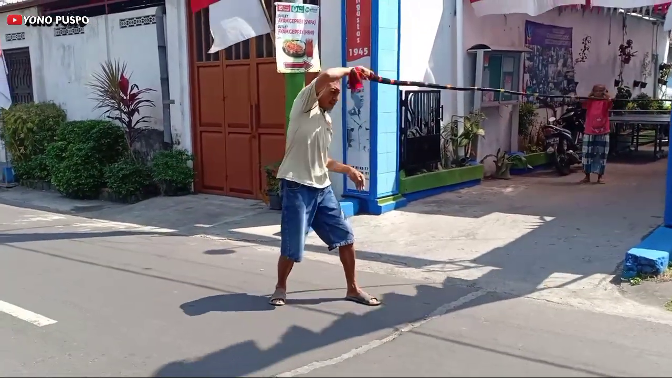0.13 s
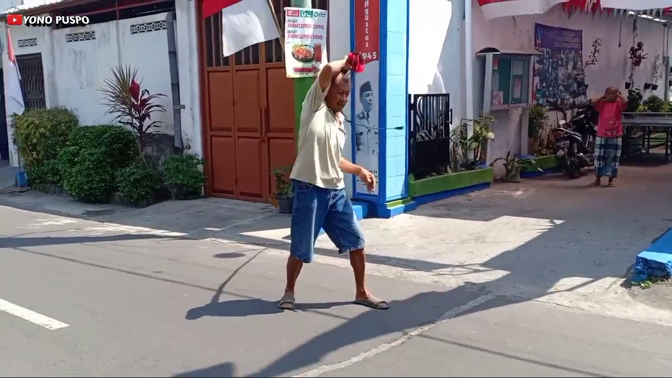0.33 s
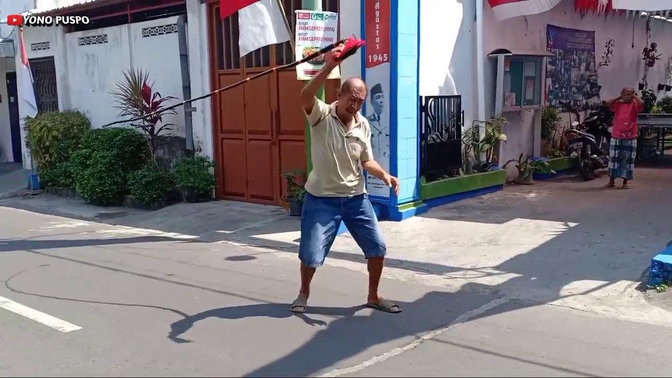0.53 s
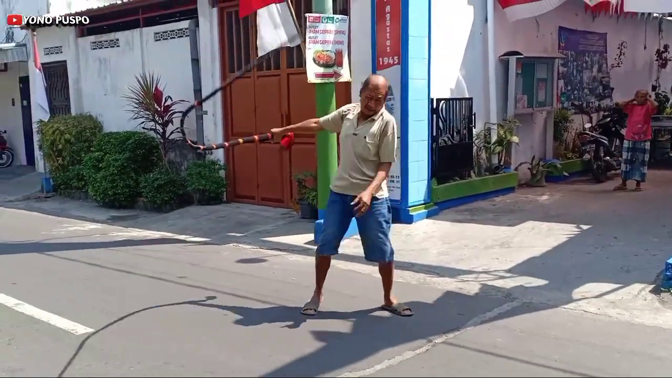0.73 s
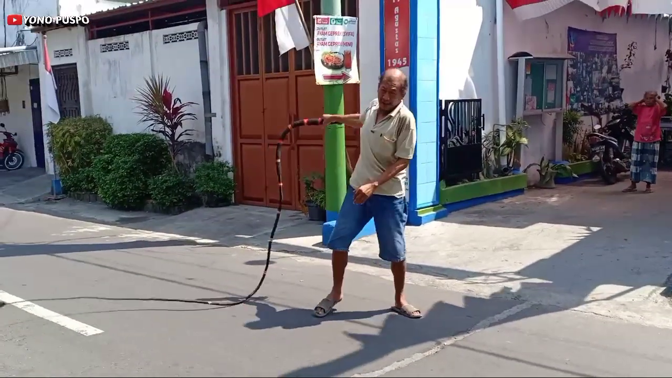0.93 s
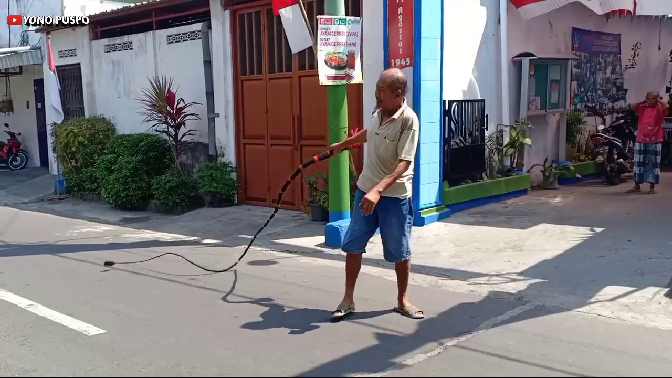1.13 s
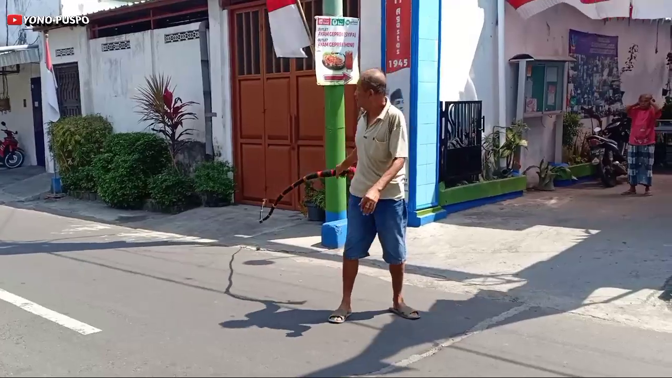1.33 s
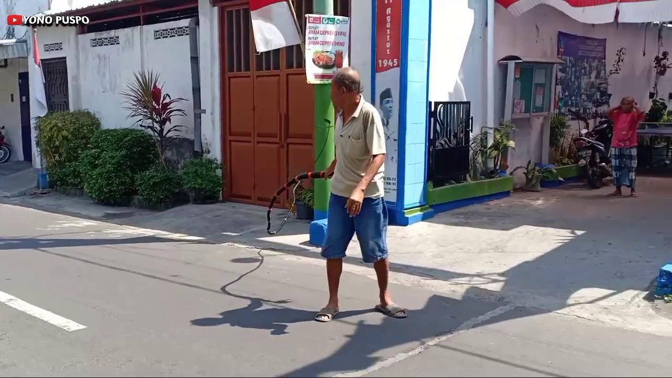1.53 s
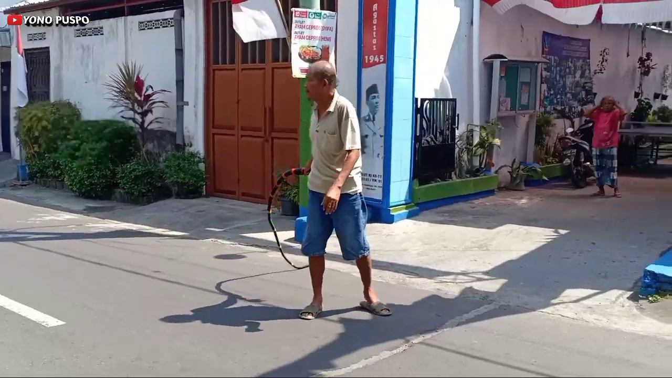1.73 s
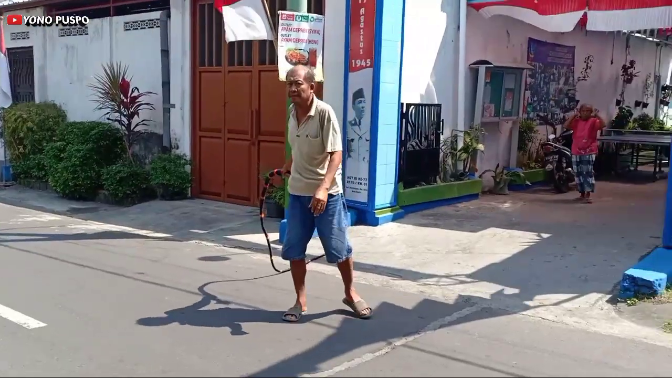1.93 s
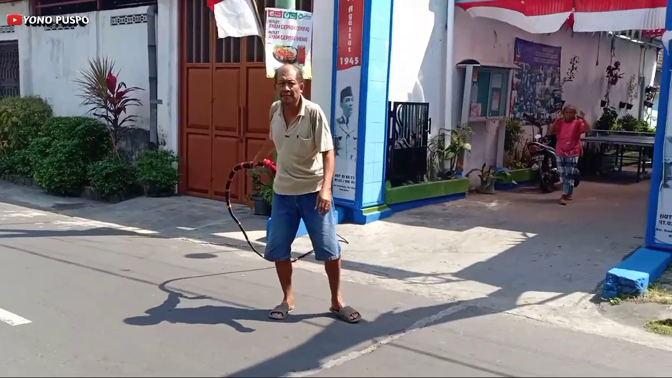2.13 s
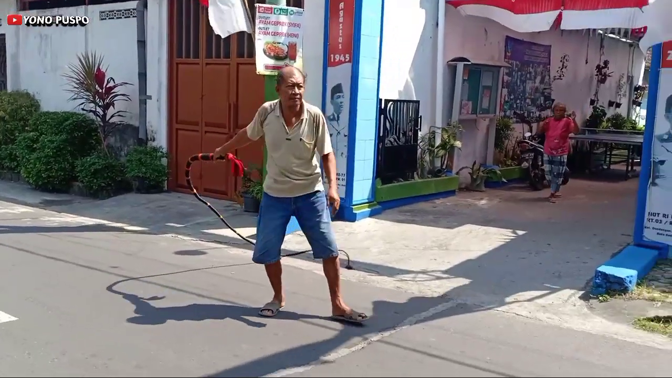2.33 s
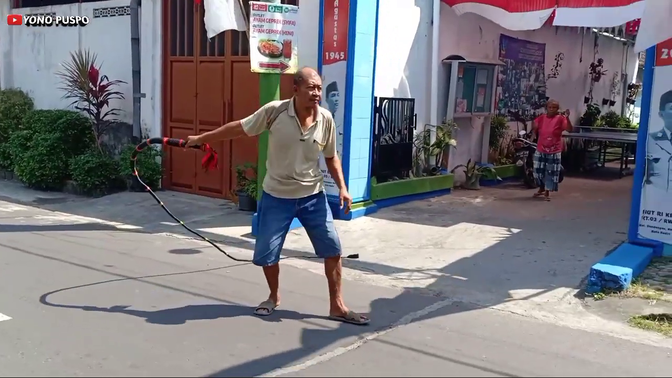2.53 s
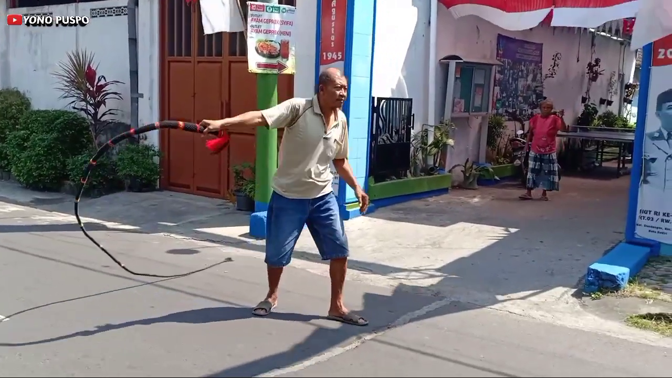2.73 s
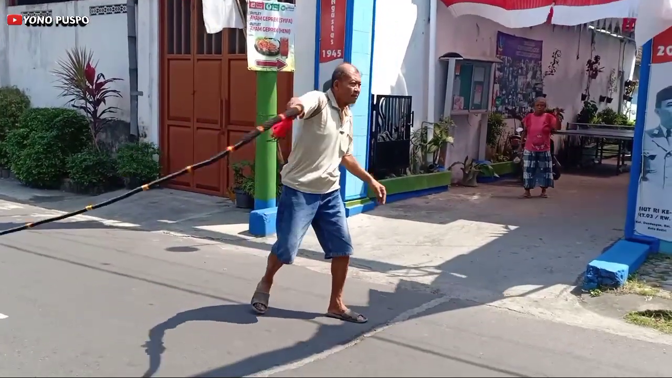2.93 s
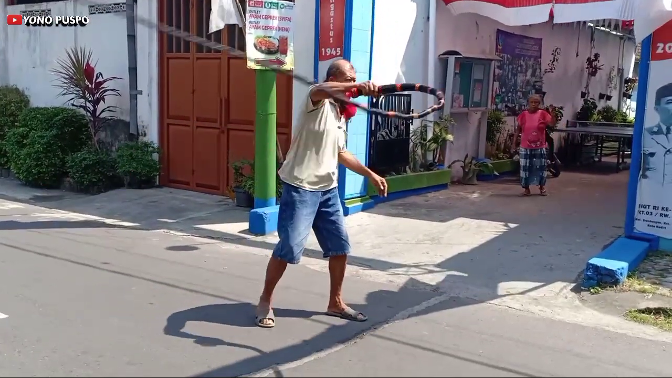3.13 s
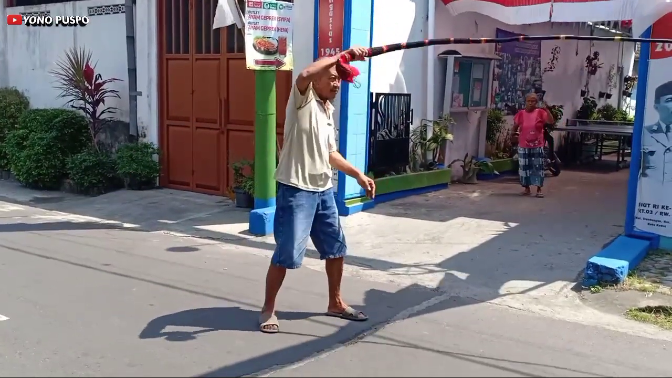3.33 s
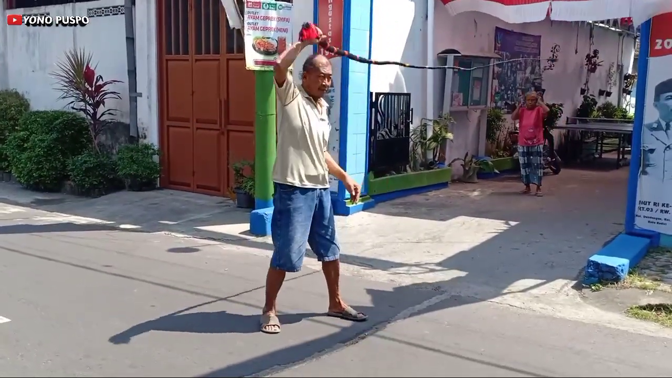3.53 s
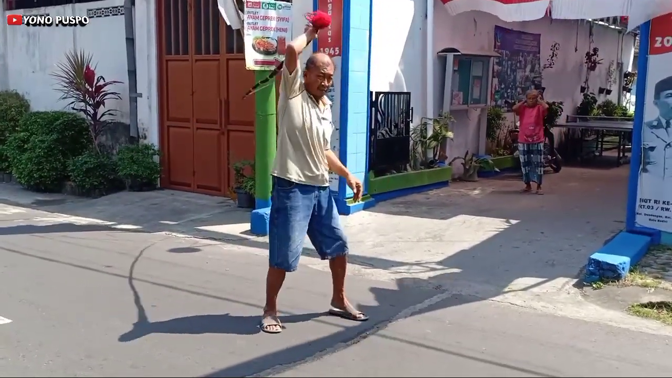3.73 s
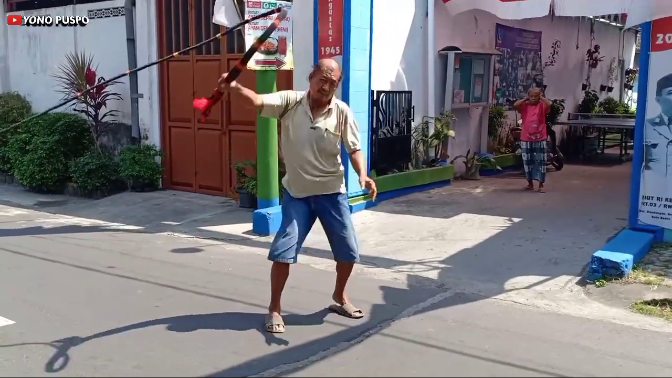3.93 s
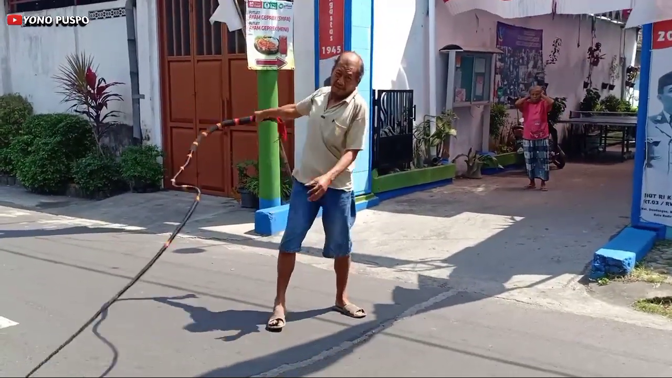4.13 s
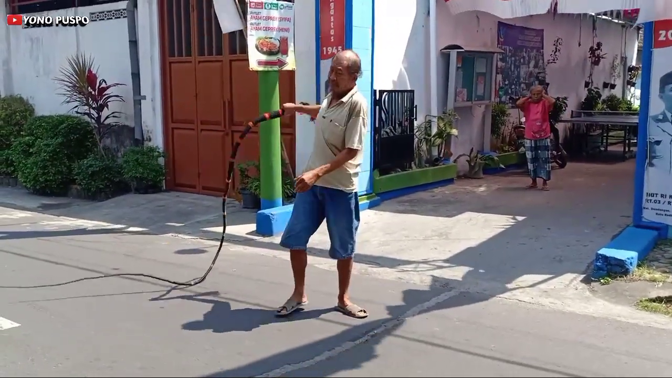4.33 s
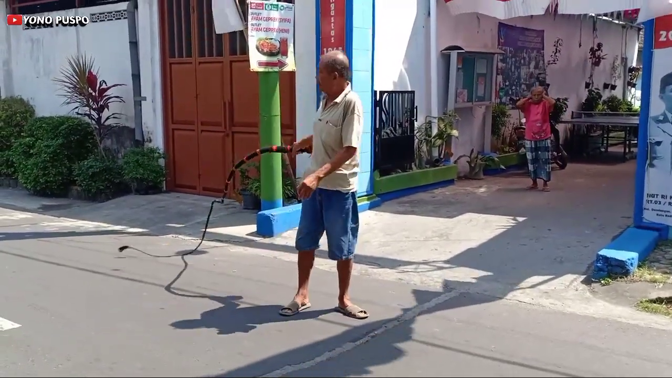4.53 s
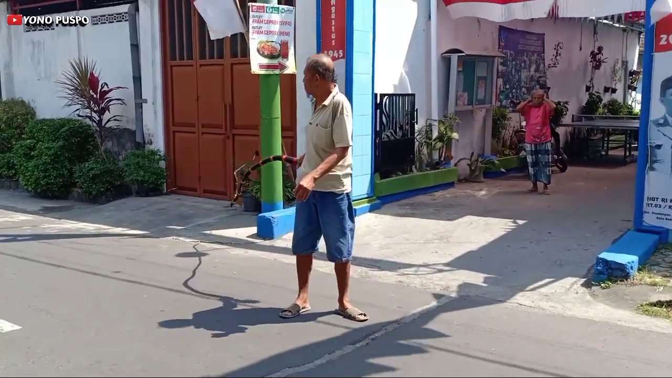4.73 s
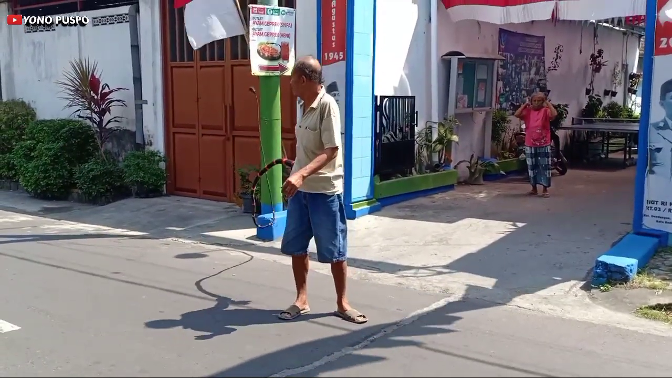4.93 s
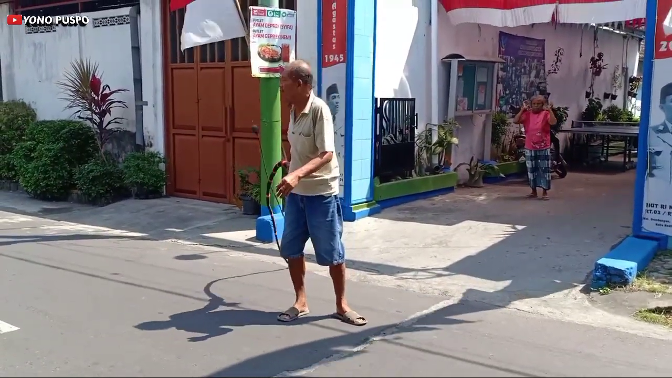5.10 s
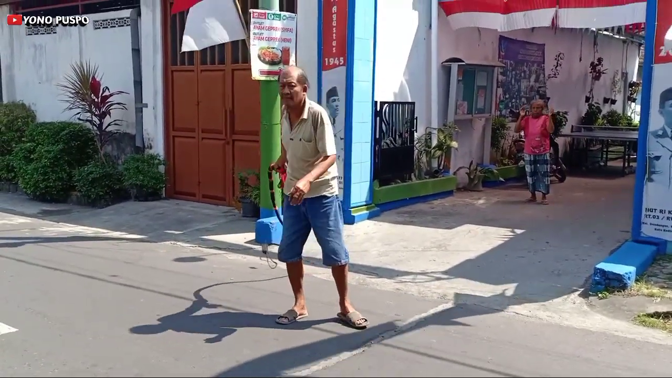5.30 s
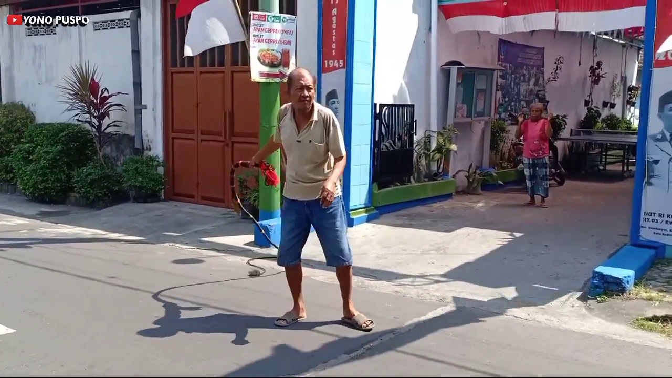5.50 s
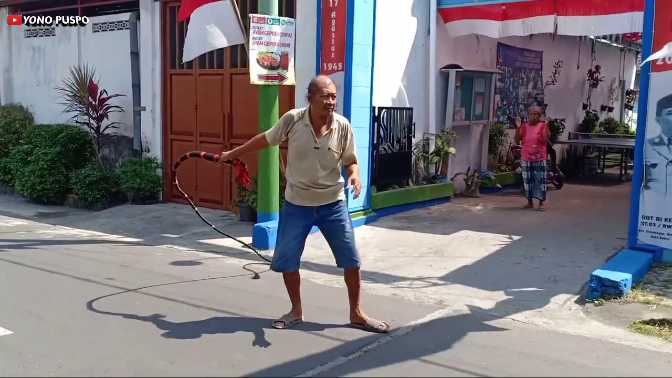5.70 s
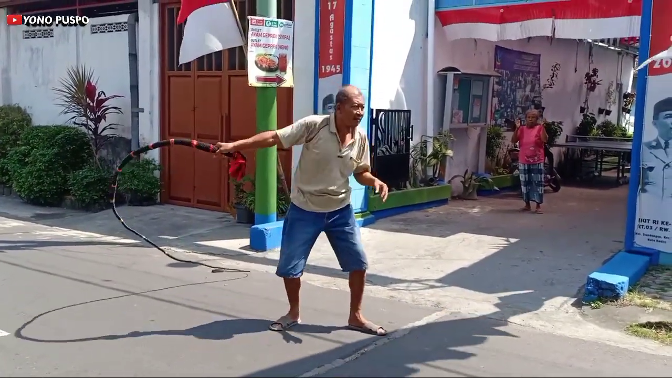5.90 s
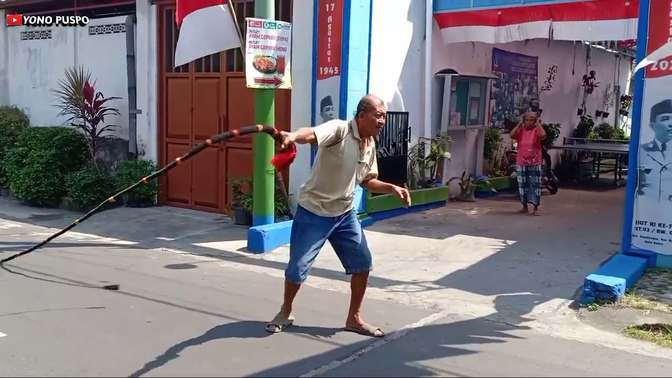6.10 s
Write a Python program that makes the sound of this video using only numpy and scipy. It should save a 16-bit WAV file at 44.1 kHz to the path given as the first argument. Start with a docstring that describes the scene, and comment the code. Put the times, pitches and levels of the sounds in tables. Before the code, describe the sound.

Outdoors in a walled street, a small motorbike draws away over low distant traffic rumble. A long whip ticks and scuffs on the tarmac, then cracks violently, with a low thump and a dense, quickly fading wash off the walls. More ticks and a soft sinking whirr lead to a second similar crack. A phone microphone nearby overloads on both, and the background dips after each.

```python
"""A small motorbike is heard first, drawing away over a town's rumble: exhaust partials, puffing hiss and gear whine.
A lash ticks, scuffs the tarmac and whirrs: damped sines, gritty noise bursts and a noise band of sinking pitch.
A long whip cracks twice in a walled street: low noise bursts, and a dense wash of the crack and its returns.
A phone with two microphone ports hears it all; its gain drops and its input clips under the shock."""
import sys
import numpy as np
from scipy import signal
from scipy.fft import rfft, irfft, next_fast_len
from scipy.io import wavfile
from scipy.ndimage import uniform_filter1d, minimum_filter1d

SR = 44100
rng = np.random.default_rng(int(sys.argv[2]) if len(sys.argv) > 2 else 0)


def dump_mix(stems):
    """Bounce the given channels to the path in sys.argv[1] as a 16-bit WAV at rate SR."""
    frames = np.atleast_2d(stems).T  # one column per channel
    limited = np.clip(frames, -1, 1)  # hard clip at full scale
    pcm = np.round(limited * 32767).astype(np.int16)
    wavfile.write(sys.argv[1], SR, pcm)


N = 276066

# Spectrum of the town's rumble: frequency_hz, level_db_per_hz
TOWN_SPECTRUM = [(18, -71), (30, -39.5), (65, -5.5), (328, -5), (355, -5.5), (612, -10.5), (716, -8.5),
                 (978, -16), (1110, -16.5), (2190, -18), (4090, -45), (15000, -43)]
TOWN_DB = -46.5

# Course of the motorbike: time_s, firing_rate_hz, distance_m, throttle_db (exhaust only), gear_whine_db
BIKE_COURSE = [(0, 37.8, 9.1, -20, -19), (.2, 37.2, 9.5, -1, -1), (.8, 35.7, 12.8, -3, 2),
               (1.5, 33.8, 17.3, 4, 1), (2, 32.3, 19, -0.5, -10), (2.6, 29.5, 19.2, -4, 2.5),
               (2.75, 36.6, 20.7, 3, -2), (3.3, 37.2, 24.7, -0.5, -8), (3.6, 35.3, 37, -3.5, 0),
               (3.9, 33.6, 35.6, 0, -5), (4.8, 38.2, 48.4, 2, -11), (6.26, 38.8, 70, 2, -29)]
# Exhaust partials: multiple_of_firing_rate, level_db
EXHAUST_PARTIALS = [(2, -11.5), (3, 1), (4, 2.5), (5, -5), (6, -14.5), (7, -12.5), (8, -27.5)]
# Spectrum of the motorbike's hiss: frequency_hz, level_db_per_hz
HISS_SPECTRUM = [(400, -39), (700, -11), (1000, -14), (1400, -19), (1620, -23.5), (1760, -8), (2150, -5),
                 (2600, -7.5), (3100, -14), (3600, -18.5), (4200, -20), (5500, -19.5), (7500, -33),
                 (15500, -57)]
EXHAUST_DB, HISS_DB, WHINE_DB = -22, -17, -23  # at 1 m, before throttle, whine level and port balance
WHINE_PER_FIRING = 59.3  # whine pitch as a multiple of the firing rate

# Lash and sandals ticking on the tarmac:
# start_s, ring_peak_db, ring_hz, ring_t60_s, knock_db (relative to the ring), left_minus_right_db
TICKS = [(0.4938, -22.5, 2590, 0.0056, -18, 16), (1.639, -38, 2157, .008, -20, 12),
         (1.787, -30, 2650, 0.0086, -12, -1), (1.799, -17.5, 1900, 0.0023, -9, 15),
         (1.801, -25.5, 430, 0.0066, -24, -9), (1.8273, -26, 643, .007, -22, 2),
         (1.8624, -19.5, 1960, 0.0032, -11.5, 16.5), (2.426, -27.5, 680, 0.0025, -25, -13),
         (2.4323, -27, 580, 0.0028, -26, -23), (2.835, -30, 1300, 0.0049, -7, 6),
         (3.475, -34, 814, .007, -18, -15), (3.99, -33, 679, 0.031, -30, 2),
         (5.029, -31.5, 858, .008, -10, -13), (5.1905, -26.5, 1940, 0.0079, 0.5, 9),
         (5.196, -28, 2076, 0.0093, -1, -3), (5.403, -30, 2140, 0.008, -3, 8),
         (5.408, -26.5, 2050, 0.0054, -4, 0)]
# Edge of a 1 kHz tick relative to its ring, its rise per octave, and dB lost per dB of knock
EDGE_1K_DB, EDGE_SLOPE_DB, DULLING = -29.5, 14, 0.74
# Drags and swishes of the lash: peak_s, level_db, rise_s, fall_s, brightness_db_per_octave
SCUFFS = [(0.294, -34, 0.0033, 0.017, 1), (0.492, -34, 0.002, 0.024, 1.5), (2.567, -39, 0.0033, .012, -1),
          (3.315, -39.5, 0.02, 0.026, -3), (3.875, -44.5, 0.025, 0.024, -1.5), (3.904, -43, 0.01, .014, 0),
          (4.729, -32, 0.0013, 0.011, -2), (5.405, -41.5, 0.0016, 0.021, -3.5),
          (6.141, -51, 0.037, 0.13, -2.5)]
# Spectrum of a scuff before its brightness tilt: frequency_hz, level_db_per_hz
GRIT_SPECTRUM = [(600, -37), (1200, -7), (2200, 1.5), (3300, -5), (5200, -1), (7500, -16), (12000, -21.5),
                 (15500, -22)]
WHIRR_PEAK_S, WHIRR_DB, WHIRR_RISE_S, WHIRR_FALL_S = 3.2, -44.5, 0.082, 0.26
# The middle pitch comes WHIRR_LEAD_S before the peak
WHIRR_FROM_HZ, WHIRR_TO_HZ, WHIRR_SINK_S, WHIRR_LEAD_S = 680, 334, 0.068, .03

# Whip cracks: start_s, level_db, left_minus_right_db, extra_fade_of_wash_db_per_s, blast_pitch_ratio
CRACKS = [(0.8236, -2, 2, 0.5, 1.08), (4.129, -2.5, 0, 3.5, 1.2)]
# Shock of the crack, then the low thumps of the overloaded microphones, before the pitch ratio and crack level:
# centre_hz, width_hz, level_db, t60_s, port_likeness (-1 to 1)
BLAST_BANDS = [(652, 500, 11.5, 0.046, 0.77), (178, 174, 8, 0.076, -.3), (42, 40, -6, 0.12, -0.47)]
# The direct crack, then the rows of walls that return it: delay_s, level_db, swell_s, fade_db_per_s
ARRIVALS = [(0.001, 6, 0.0011, 1103.5), (0.038, 3.5, 0.02, 351), (0.061, -5.5, .015, 99.5),
            (.225, -12, 0.044, 57.5)]
# Spectrum of the direct crack and its returns: frequency_hz, level_db_per_hz
WASH_SPECTRUM = [(35, -58), (60, -42.5), (214, -15.5), (400, -14), (780, -3), (1000, -7.5), (1600, -6.5),
                 (2000, -2), (2450, -0.5), (3000, -7), (3600, -12), (5000, -15), (6100, -15.5), (7500, -28),
                 (15000, -43.5)]
# Bass leaking out of the street and treble absorbed by air: frequency_hz, extra_loss_db_per_s
LOSS = [(60, 119.5), (150, 95.5), (300, 10), (700, 19), (2300, 15), (5000, 24), (9000, 54), (15000, 109)]
LOSS_PIVOT_S = 0.17  # the extra loss is nil at this time

# Likeness of the two ports, before each source's share: frequency_hz, likeness (0 to 1)
PORT_LIKENESS = [(60, 0.93), (300, 1), (700, 0.2), (2500, 0.39), (6000, 0), (15000, 0.5)]
# Balance of the ports: frequency_hz, left_minus_right_db
PORT_BALANCE = [(60, 2.5), (110, 3.5), (200, 2), (380, 2), (700, 0.5), (1290, 4.5), (2380, 5.5),
                (4390, -2.5), (8110, 4), (15000, 1.0)]
PORT_LAG_S = 0.00043  # the left port hears later
BOOST_DB, RECOVER_DB_S, AHEAD_S = 9.5, 1.36, .026  # gain control: boost, recovery in dB/s, look-ahead
TOP_HZ = 15600


def undb(db):
    """Decibel law: 20 dB is a tenfold amplitude."""
    return 10 ** (np.asarray(db) / 20)


def over_hz(table, hz):
    """Interpolation of a frequency table on a logarithmic axis."""
    f, v = np.transpose(table)
    return np.interp(np.log(np.maximum(hz, 1)), np.log(f), v)


def over_time(table):
    """Linear interpolation of each column of a time table."""
    s, *columns = np.transpose(table)
    return [np.interp(np.arange(N) / SR, s, c) for c in columns]


def unit(x):
    """Normalisation to unit RMS."""
    return x / np.sqrt(np.mean(x ** 2))


def walk(rate, size):
    """Random modulation: levels held 1 / rate seconds and slewed twice."""
    k = int(SR / rate)
    steps = np.repeat(rng.standard_normal(size // k + 1), k)
    return 1.17 * uniform_filter1d(uniform_filter1d(steps, k), k)[:size]


def ports(size, lag_s, share):
    """Partial coherence: spectra of noise partly common to two ports, the common part delayed at the left."""
    hz = np.fft.rfftfreq(size, 1 / SR)
    alike = np.clip(share * over_hz(PORT_LIKENESS, hz), 0, 1)
    common, own_left, own_right = rfft(rng.standard_normal((3, size)))
    tilt = undb(over_hz(PORT_BALANCE, hz) / 2)
    late = np.exp(-2j * np.pi * hz * lag_s)
    left = np.sqrt(alike) * common * late + np.sqrt(1 - alike) * own_left
    right = np.sqrt(alike) * common + np.sqrt(1 - alike) * own_right
    return hz, np.array([left * tilt, right / tilt])


def bands(spectrum, size, lag_s, share, gain_db):
    """Subtractive synthesis: coloured two-port noise in half-octave bands, each with its own level in time."""
    hz, pair = ports(size, lag_s, share)
    pair = pair * undb(over_hz(spectrum, hz))
    pair /= np.sqrt(np.mean(irfft(pair, size) ** 2))
    out = 0
    for centre in 30 * np.sqrt(2) ** np.arange(19):
        slot = np.clip(1 - np.abs(2 * np.log2(np.maximum(hz, 1) / centre)), 0, 1)
        out = out + irfft(pair * slot, size) * undb(gain_db(centre))
    return out


def late_left(sound):
    """Path difference: the left port hears the same sound a fraction of a millisecond later."""
    return np.array([np.roll(sound, int(PORT_LAG_S * SR)), sound])


def add(out, sound, s, pan_db=0):
    """Superposition of a sound at its start time, with a level difference between the ports."""
    i = int(s * SR)
    n = min(sound.shape[-1], N - i)
    balance = undb(np.array([[pan_db], [-pan_db]]) / 2)
    out[:, i:i + n] += (sound * balance)[:, :n]


def whirr(hz, width_hz):
    """Quadrature modulation: low-passed noise carried up to a moving pitch."""
    low_pass = signal.butter(2, width_hz / 2, fs=SR, output="sos")
    slow = signal.sosfilt(low_pass, rng.standard_normal((2, N)))
    turn = 2 * np.pi * np.cumsum(hz) / SR
    return unit(slow[0] * np.sin(turn) + slow[1] * np.cos(turn))


def town(size):
    """Sum of far traffic: noise bands swell together and flicker alone."""
    swell = 0.72 * walk(0.92, size)
    rumble = bands(TOWN_SPECTRUM, size, 0, 0.78, lambda hz: swell + 0.97 * walk(6, size))
    return undb(TOWN_DB) * rumble[:, :N]


def bike(size):
    """Periodic firing gives exhaust partials, puffing hiss and two gear whines, under the 1/distance law."""
    hz, metres, throttle_db, whine_db = over_time(BIKE_COURSE)
    turn = 2 * np.pi * np.cumsum(hz * (1 + 0.0063 * walk(12, N))) / SR
    exhaust = sum(undb(db + 3.8 * walk(9, N)) * np.sin(k * turn + k * k) for k, db in EXHAUST_PARTIALS)
    exhaust = unit(exhaust) * undb(EXHAUST_DB + throttle_db)

    puffs = 1 + 0.18 * np.sin(2 * turn) + 0.076 * np.sin(4 * turn)
    hiss = bands(HISS_SPECTRUM, size, PORT_LAG_S, 0.95, lambda hz: 1.9 * walk(11, size))[:, :N]
    hiss = hiss * puffs * undb(HISS_DB)

    whine_hz = WHINE_PER_FIRING * hz
    whine = whirr(whine_hz, 31) + 0.93 * whirr(1.15 * whine_hz, 45)
    whine = late_left(whine * undb(WHINE_DB + whine_db)) * np.array([[1.29], [0.54]])
    return (exhaust + hiss + whine) / metres


def swing():
    """Narrow-band noise of motion: the swung lash sheds a whirring band that sinks as it slows."""
    u = np.arange(N) / SR - WHIRR_PEAK_S
    sink = (1 - np.tanh((u + WHIRR_LEAD_S) / (2 * WHIRR_SINK_S))) / 2
    hz = WHIRR_TO_HZ + (WHIRR_FROM_HZ - WHIRR_TO_HZ) * sink
    rise = np.exp(-(u / WHIRR_RISE_S) ** 2 / 2)
    fall = np.exp(-np.abs(u) / WHIRR_FALL_S)
    return (whirr(hz, 91.5) + 0.66 * whirr(hz, 280)) * undb(WHIRR_DB) * np.where(u < 0, rise, fall)


def scuffs():
    """Friction noise: gritty bursts with a Gaussian rise and an exponential fall."""
    out, size = np.zeros((2, N)), 8192
    u = (np.arange(size) - size // 2) / SR
    for s, db, rise, fall, tilt_db in SCUFFS:
        hz, pair = ports(size, PORT_LAG_S, 1.)
        colour_db = over_hz(GRIT_SPECTRUM, hz) + tilt_db * np.log2(np.maximum(hz, 1) / 4000)
        grit = irfft(pair * undb(colour_db), size) * undb(2.2 * walk(400, size))
        envelope = np.exp(np.where(u < 0, -(u / rise) ** 2 / 2, -u / fall))
        add(out, unit(grit) * undb(db) * envelope, s - size // 2 / SR)
    return out


def ticks():
    """Impact excitation: a quickly damped ring with a sharp edge and a dull knock."""
    out, t = np.zeros((2, N)), np.arange(2500) / SR
    edge = np.sin(2 * np.pi * 5200 * t) * (t / 0.00027) ** 2 * np.exp(2 - 2 * t / 0.00022)
    knock = np.sin(2 * np.pi * 1050 * t) * np.exp(-(t / 0.0017) ** 2)
    for s, db, hz, t60, knock_db, pan_db in TICKS:
        decay = np.exp(-np.log(1000) * t / max(t60, .001))
        ring = np.sin(2 * np.pi * hz * t) * decay * np.clip(t * hz, 0, 1) ** 2
        edge_db = EDGE_1K_DB + EDGE_SLOPE_DB * np.log2(hz / 1000) - DULLING * knock_db
        tick = ring / np.abs(ring).max() + undb(edge_db) * edge + undb(knock_db) * knock
        add(out, late_left(undb(db) * tick), s, pan_db)
    return out


def street_db(t):
    """Energy addition: the powers of the direct crack and of all the rows of walls sum."""
    power = 1e-12
    for s, db, swell, fade_db in ARRIVALS:
        fading = undb(2 * (db - fade_db * np.maximum(t - s, 0)))  # doubled dB gives power
        power = power + fading * np.exp(-(np.minimum(t - s, 0) / swell) ** 2)
    return 10 * np.log10(power)


def wash(t, fade_db):
    """Multiple reflection: the direct crack runs into a dense, slightly lumpy wash from walls, gates and roofs."""
    size = len(t)
    # single fronts stand out in all bands at once
    shared_db = street_db(t) + walk(160, size)

    def gain_db(hz):
        loss_db = (over_hz(LOSS, hz) + fade_db) * (t - LOSS_PIVOT_S)
        return shared_db - loss_db + 1.34 * walk(69.9, size)

    ring = bands(WASH_SPECTRUM, size, PORT_LAG_S, .6, gain_db)
    return ring * np.clip(t / 0.0018, 0, 1) ** 2


def blast(t, pitch):
    """Shock and overload thumps: low noise bands swell for a few milliseconds and decay exponentially."""
    out = 0
    for hz, width_hz, db, t60, alike in BLAST_BANDS:
        edges = pitch * np.array([hz - width_hz / 2, hz + width_hz / 2])
        band_pass = signal.butter(2, edges, "band", fs=SR, output="sos")
        mid, side = signal.sosfilt(band_pass, rng.standard_normal((2, len(t))))
        alike = np.clip(alike, -1, 1)
        pair = np.sqrt(1 + alike) * mid + np.sqrt(1 - alike) * side * np.array([[1], [-1]])
        envelope = np.clip(t / 0.0048, 0, 1) ** 4 * np.exp(-np.log(1000) * t / t60)
        out = out + unit(pair) * undb(db) * envelope
    return out


def cracks():
    """Direct and reflected sound: each crack is a low blast and a wash that the street prolongs."""
    out, t = np.zeros((2, N)), np.arange(49152) / SR
    for s, db, pan_db, fade_db, pitch in CRACKS:
        add(out, wash(t, fade_db) * undb(db), s, pan_db)
        add(out, blast(t, pitch) * undb(db), s - .003, pan_db)
    return out


def scene():
    """Linear superposition of the sources, from background to foreground."""
    size = next_fast_len(N)
    return town(size) + bike(size) + swing() + scuffs() + ticks() + cracks()


def record(dry):
    """Look-ahead gain control drops its boost before an overload and regains it slowly; a soft knee clips."""
    ahead = int(AHEAD_S * SR)
    peak = -minimum_filter1d(-np.abs(dry).max(axis=0), ahead, origin=-(ahead // 2))
    cut = BOOST_DB * (peak > 1)
    regained = RECOVER_DB_S * np.arange(N) / SR
    # the latest overload restarts a straight recovery in dB
    cut = np.maximum.accumulate(np.where(cut > 0, cut + regained, 0)) - regained
    cut = np.maximum(cut, 0)
    loud = dry * undb(BOOST_DB - uniform_filter1d(cut, size=200))
    knee = 5.1
    clipped = loud / (1 + np.abs(loud) ** knee) ** (1 / knee)
    low_pass = signal.ellip(8, .2, 60, TOP_HZ, fs=SR, output="sos")
    return signal.sosfilt(low_pass, clipped)


dry = scene()
out = record(dry)
dump_mix(out)
```